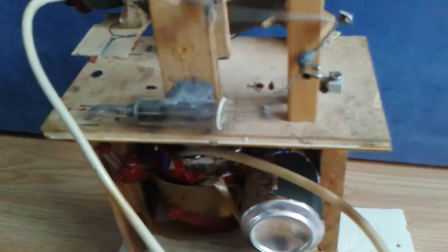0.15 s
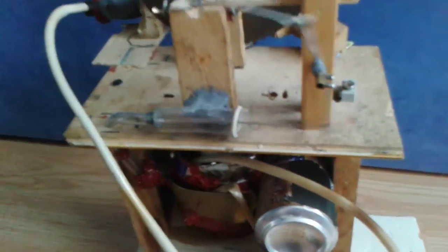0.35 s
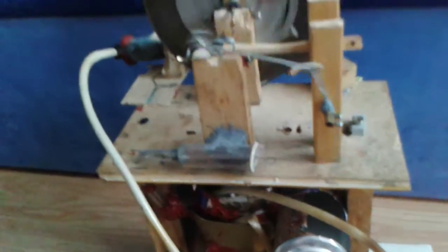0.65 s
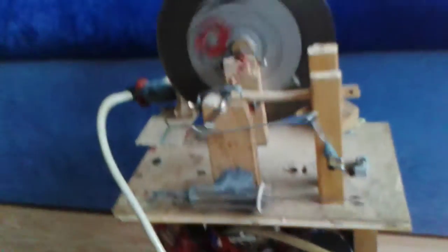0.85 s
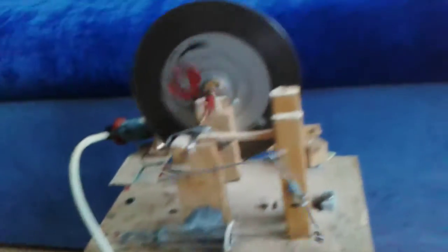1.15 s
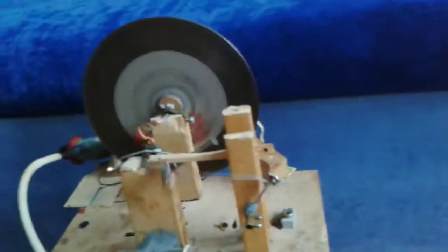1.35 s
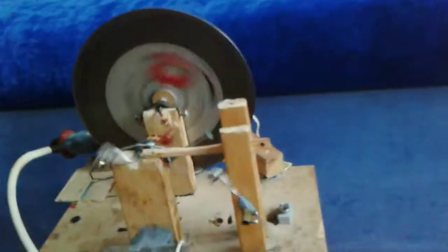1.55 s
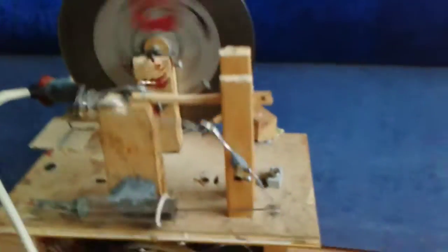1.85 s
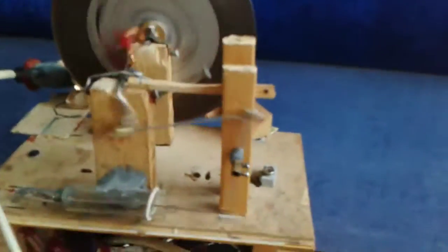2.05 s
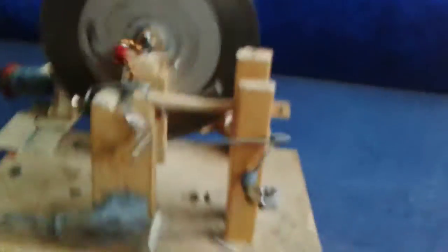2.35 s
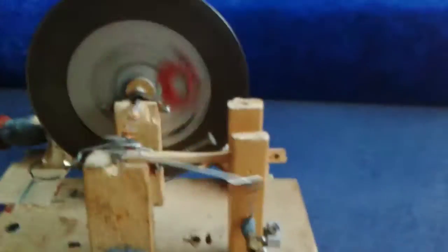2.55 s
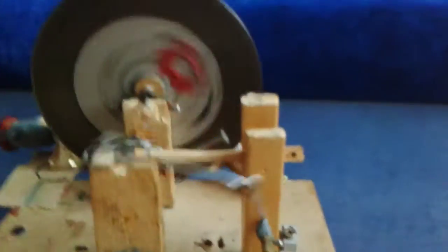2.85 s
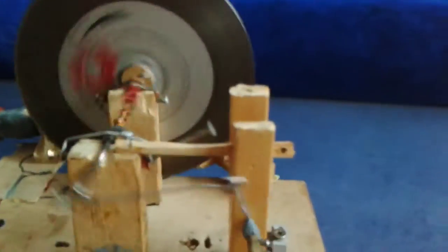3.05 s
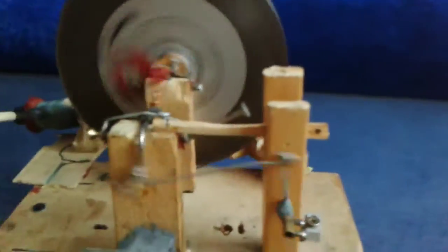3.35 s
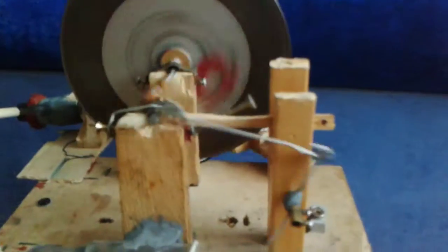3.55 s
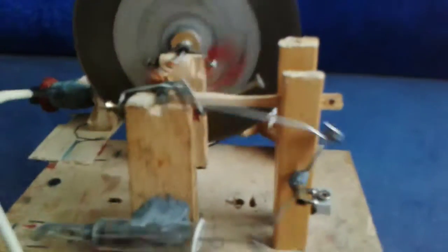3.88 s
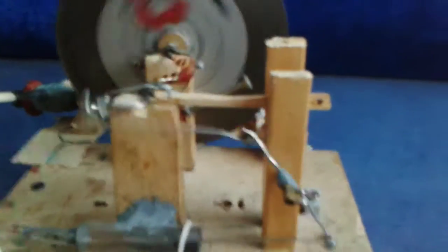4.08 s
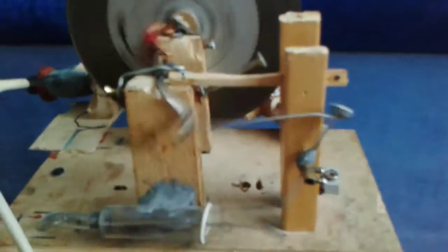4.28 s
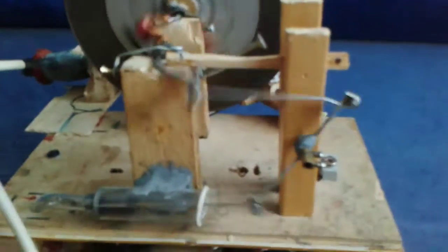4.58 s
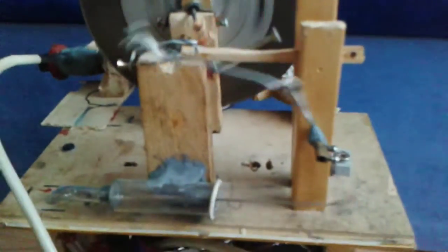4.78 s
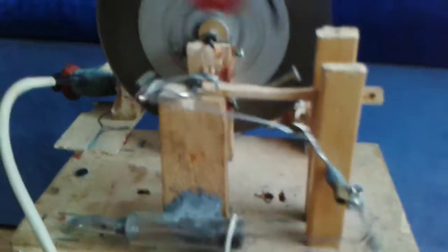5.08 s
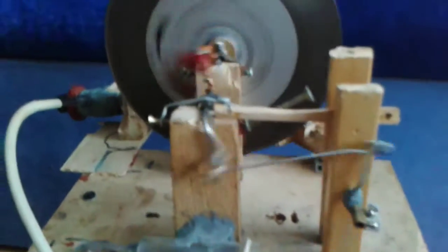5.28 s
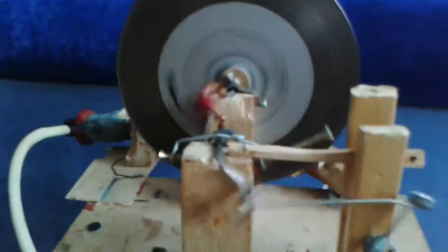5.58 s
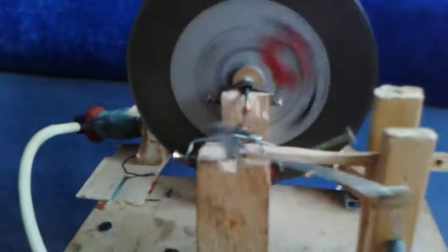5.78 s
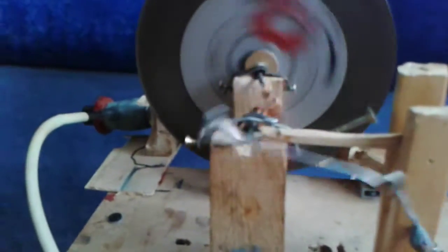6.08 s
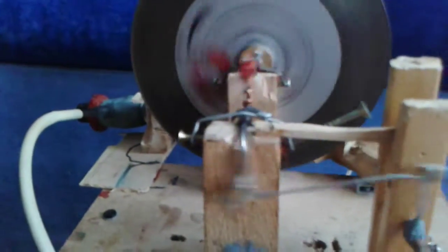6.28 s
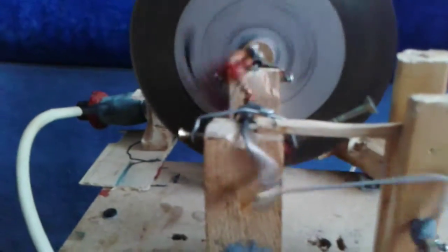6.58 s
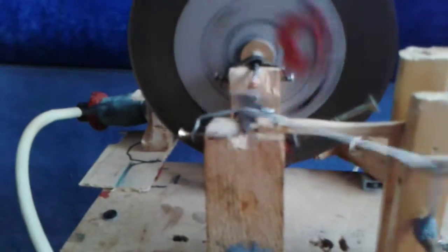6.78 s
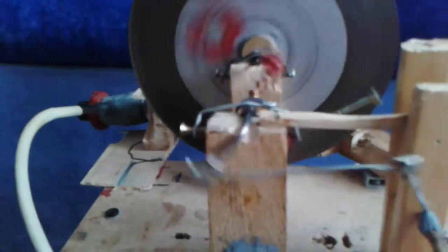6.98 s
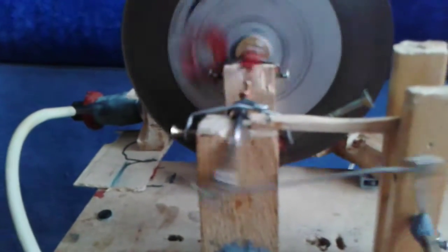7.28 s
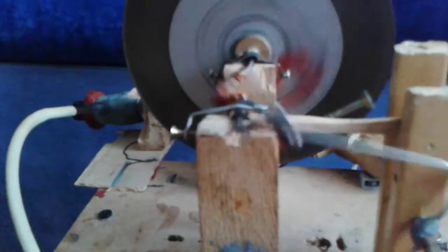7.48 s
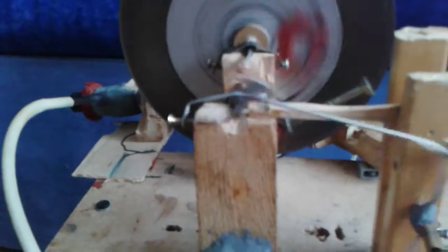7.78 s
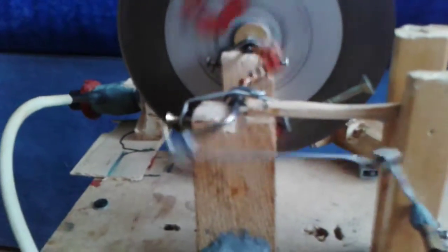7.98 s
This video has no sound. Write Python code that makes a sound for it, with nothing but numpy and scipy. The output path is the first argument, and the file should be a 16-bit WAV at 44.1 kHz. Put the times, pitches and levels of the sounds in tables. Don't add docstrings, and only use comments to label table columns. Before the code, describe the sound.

A sharp tick over a faint dull bump opens at 0.06 seconds, already in full steady running. A small engine turns about three times a second: each turn gives one crisp double-edged metallic tick, then about half a turn later a looser cluster of three, roughly six stroke groups a second, slowing only slightly. Wire brightness, dry wooden knocks and a soft hollow can note near 600 hertz ring briefly in a small room. Pump joints add lighter clicks between. Airy, scratchy piston rubbing and chatter strengthen from 2.3 to 3.3 seconds, flare briefly near 3.15 and 5, then fade lower after 5.5. Low bumps come near 0.5, 2.6, 2.7, 3.7, 3.9 and 4.6. After 5.4 the ticks sound a little duller. One especially bright snap stands out at 6.9. A low soft bump lingers at 7.9 as the ticking continues to the cut at 8.1. Close microphone, thin bass, light hiss.

```python
import sys
import numpy as np
from scipy import signal
from scipy.fft import rfft, irfft, next_fast_len
from scipy.io import wavfile
from scipy.ndimage import uniform_filter1d

SR = 44100
rng = np.random.default_rng(int(sys.argv[2]) if len(sys.argv) > 2 else 0)


def invert_db(x):
    u = np.asarray(x, float) / 20
    return 10 ** u


def transcribe(u):
    v = np.clip(np.atleast_2d(u).T, -1, 1)
    q = np.round(v * 32767).astype(np.int16)
    wavfile.write(sys.argv[1], SR, q)


N = 358533


def level(x, db):
    return x * invert_db(db) / np.sqrt(np.mean(x ** 2))


def colour(x, points):
    hz, db = np.transpose(points)
    size = next_fast_len(len(x))
    f = np.arange(size // 2 + 1) * SR / size + 1
    gain = invert_db(np.interp(np.log(f), np.log(hz), db))
    return irfft(rfft(x, size) * gain, size)[:len(x)]


def along(curve, s):
    return np.interp(s, *np.transpose(curve))


def walk(rate_hz):
    held = int(SR / rate_hz)
    steps = np.repeat(rng.standard_normal(N // held + 1), held)
    return 1.25 * uniform_filter1d(steps, held)[:N]


def decay(t, t60_s):
    return np.exp(-np.log(1000) * t / t60_s)


def place(times_s, sounds):
    out = np.zeros(N + len(sounds[0]))
    for s, sound in zip(times_s, sounds):
        i = int(np.clip(s * SR, 0, N))
        out[i:i + len(sound)] += sound
    return out[:N]


# frequency_hz, level_db
QUIET_SPECTRUM = [(20, -11), (50, -2), (110, 7), (250, -2.5), (476, -3), (750, -3), (2340, -16),
                  (3810, -4.5), (6030, -7), (7690, -31), (15000, -13.5)]


def quiet(push):
    noise = level(colour(rng.standard_normal(N), QUIET_SPECTRUM), -66)
    rumble = signal.sosfilt(signal.butter(2, 300, fs=SR, output="sos"), noise)
    shaking = signal.lfilter([1 / 2500], [1, 1 / 2500 - 1], np.abs(push))
    return noise + rumble * invert_db(2.6 * walk(11)) * level(shaking, 1.2)


# start_s, level_db, pitch_hz, t60_s
BUMPS = [
    (0.057, -49.5, 116, 0.061),
    (0.513, -48, 113, 0.062),
    (2.56, -35, 130, 0.025),
    (2.716, -40, 115, 0.03),
    (3.669, -49, 114, 0.087),
    (3.941, -39, 121, 0.017),
    (4.649, -55, 108, 0.11),
    (7.891, -49, 141, 0.33),
]


def bumps():
    t = np.arange(12000) / SR
    sag = t + 0.0047 * (1 - np.exp(-t / 0.026))
    rough = 1 + 0.17 * walk(83)[:len(t)]
    swings = []
    for _, db, hz, t60_s in BUMPS:
        envelope = (1 - np.exp(-t / 0.003)) * decay(t, t60_s)
        swings.append(invert_db(db + 5) * envelope * np.sin(2 * np.pi * hz * sag))
    return place([row[0] for row in BUMPS], np.array(swings) * rough)


# time_s, level_db
RUB = [(0, -2), (.9, -4.5), (1.9, -0.5), (2.35, 2), (2.62, 1.5), (2.8, 5), (3.07, -2.5), (3.15, 11),
       (3.21, 1), (3.25, 6), (3.3, -3), (4.5, 1), (4.9, -5), (4.97, 6), (5.1, -5.5), (5.8, -12),
       (6.95, -9.5), (8.13, -9.5)]


def rattle():
    rub_db = along(RUB, np.arange(N) / SR)
    hiss = colour(rng.standard_normal(N), [(1500, -12), (4000, 0.0), (6000, 9.5), (8000, -1.5), (15000, -12.5)])
    grains = rng.standard_normal(N) * invert_db(3.5 * walk(300))
    chatter = colour(grains, [(500, -7.5), (1000, -5.5), (1350, 3), (2100, -3.5), (5000, -26.5)])
    hiss = level(hiss, 3.0) * invert_db(1.8 * walk(30) + 1.2 * walk(250))
    chatter = level(chatter, 1.5) * invert_db(2.6 * walk(50))
    return hiss * invert_db(-59.5 + rub_db) + chatter * invert_db(-59.5 + 0.8 * rub_db)


# frequency_hz, level_db (per Hz)
TAIL_SPECTRUM = [(120, -5), (200, -3), (373, -6), (634, -2.5), (949, -7), (4510, -2), (5830, -1),
                 (7950, -15.5), (13500, -30), (15100, -28), (16000, -63)]


def tail(x):
    build_up_s, low_t60_s, high_t60_s = 0.004, 0.23, 0.18
    t = np.arange(16000) / SR
    lumpy = rng.standard_normal(len(t)) * invert_db(1.5 * walk(250)[:len(t)])
    noise = colour(lumpy, TAIL_SPECTRUM)
    low = signal.sosfilt(signal.butter(2, 2200, fs=SR, output="sos"), noise)
    faded = low * decay(t, low_t60_s) + (noise - low) * decay(t, high_t60_s)
    response = faded * (1 - np.exp(-t / build_up_s))
    return signal.fftconvolve(x, response / np.sqrt(np.sum(response ** 2)))[:N]


def lid():
    lid_hz, lid_db, lid_t60_s = 584.5, -50.5, 0.12
    t = np.arange(6000) / SR
    times_s = [row[0] for row in OUTWARD + INWARD]
    chance = rng.standard_normal((len(times_s), 2))
    ring = (1 - np.exp(-t / 0.0044)) * decay(t, lid_t60_s)
    hz = lid_hz * (1 + .01 * chance[:, :1])
    notes = np.sin(2 * np.pi * hz * t) * invert_db(lid_db + 3 * chance[:, 1:])
    return place(times_s, ring * notes)


# time_s, level_db
BOARD = [
    (0, 1.5),
    (1.3, -1.5),
    (1.9, 1.5),
    (3.2, 1),
    (4.2, 2.5),
    (4.9, -2),
    (5.5, -4.5),
    (7.2, -4),
    (8.13, -5),
]


def shakes():
    rows = []
    for table, delay_s, can_db, length_s in ((OUTWARD, .00336, -47, .054), (INWARD, .014, -40.5, .022)):
        for row in table:
            db = can_db + along(BOARD, row[0]) + 2.5 * rng.standard_normal()
            rows.append((row[0] + delay_s, db, length_s))
    return rows


def can():
    t = np.arange(6000) / SR
    rings, rows = [], shakes()
    for (_, db, length_s), (phase, beat, off) in zip(rows, rng.random((len(rows), 3))):
        hz = 682 - 550 * length_s + 4 * (off - .5)
        fall = np.exp(-(t / (1.06 * length_s)) ** 2) + 0.14 * np.exp(-t / 0.073)
        swell = (1 - np.exp(-t / 0.0058)) ** 2 * fall
        pair = np.sin(2 * np.pi * (hz * t + phase)) + 0.25 * np.sin(2 * np.pi * ((hz + 32) * t + beat))
        rings.append(invert_db(db + 1.0) * swell * pair)
    return place([row[0] - .004 for row in rows], rings)


# start_s, wire_db, wood_minus_wire_db
PUMP_PIN = [(.1072, -45.5, 1), (.4198, -47.5, 1), (.7272, -44, -4), (1.0365, -39, -6),
            (1.3566, -40.5, -2.5), (1.6734, -39.5, -11), (1.991, -36, -7), (2.3118, -40.5, -5),
            (2.6331, -41, -1.5), (2.9577, -41, -1), (3.284, -36, -9), (3.6122, -37, -14),
            (3.9421, -40, -9.5), (4.272, -39, -9.5), (4.6012, -40, -13), (4.9313, -40.5, -3.5),
            (5.26, -46, -9), (5.593, -44, -8), (5.9257, -40, -12)]
# start_s, wire_db, wood_minus_wire_db
PUMP_PUSH = [(2.4083, -40, -10), (2.7304, -31.5, -12), (3.0576, -41.5, -3.5), (3.382, -41, -2),
             (3.7102, -38.5, -0.5), (4.0438, -37.5, -6), (4.3758, -39, -7), (4.7073, -37.5, -2.5),
             (5.031, -52.5, 9.5), (5.36, -39.5, -11), (5.694, -48, -12), (6.0275, -48, -15),
             (6.3532, -44, -8), (6.688, -50.5, 0.5), (7.014, -43.5, -2.5), (7.3477, -48.5, -3),
             (7.6788, -49, -7), (8.006, -43.5, -7)]
# start_s,
# wire_db, wood_minus_wire_db
PUMP_PULL = [(.2853, -42.5, -1.5), (.592, -37.5, -9.5), (.9019, -38, -11.5), (1.2133, -37.5, -7.5),
             (1.5286, -39.5, -20), (1.8414, -36, -6.5), (2.1666, -42.5, -6), (2.4878, -39.5, -9),
             (2.811, -38, -9), (3.141, -45, -10), (3.463, -39.5, -9), (3.7932, -56, 15.5),
             (4.1217, -39.5, -29), (4.4505, -36, -4.5), (4.7812, -38.5, -4)]
# start_s, wire_db, wood_minus_wire_db, pitch_hz
STRAY = [(0.302, -65, 22.5, 1735), (.5498, -48, 3.5, 1420), (1.3337, -41.5, -5, 1620),
         (1.6367, -41.5, -10, 2020), (1.71, -41.5, -0.5, 1380), (2.266, -44, 2, 5870),
         (2.4482, -45, -16, 1460), (2.4772, -43, -4, 1360), (2.565, -39, -25, 8240),
         (2.663, -44, -36, 6400), (2.7653, -38, 8, 5430), (2.8734, -35, -13, 1380),
         (2.9053, -46, -12, 5700), (2.921, -43, -3, 1340), (3.1165, -44, -5, 1340), (3.791, -42, -14, 6230),
         (3.5977, -43, 6, 6000), (3.6326, -42, -4, 1560), (3.762, -35, -6.5, 1325),
         (3.8745, -43.5, -3, 1890), (4.196, -45, -6, 1650), (4.4903, -38, -11, 1450),
         (4.8493, -49, 5, 1850), (6.238, -41, -8, 1250), (6.875, -22, -12, 5400), (7.003, -42, -12, 1320),
         (7.0295, -45, 1, 2370), (7.4972, -46.5, -11, 5300), (7.7912, -47, -14, 1280),
         (8.1224, -48, -17, 5340)]
PIN_HZ, PUSH_HZ, PULL_HZ = 1992, 1304, 1306


def loose_parts():
    pump = []
    for table, hz in ((PUMP_PIN, PIN_HZ), (PUMP_PUSH, PUSH_HZ), (PUMP_PULL, PULL_HZ)):
        pump += [(*row, hz) for row in table]
    return pump + STRAY


def pings():
    s, wire_db, wood_rel_db, hz = np.transpose(loose_parts())[:, :, None]
    t = np.arange(900) / SR
    low_db = wire_db + wood_rel_db + 6.0 + 3 * (hz == PIN_HZ)
    db = np.where(hz > 3500, wire_db + 14.0, low_db)
    cycles = t * hz
    shape = (1 - np.exp(-cycles / 1.6)) ** 2 * np.exp(-cycles / 8)
    note = np.sin(2 * np.pi * cycles) + 0.29 * np.sin(2 * np.pi * 1.35 * cycles)
    return place(s[:, 0] - .001, invert_db(db) * shape * note)


def strike(modes, count, scatter_db, detune, contact_s, size):
    hz, db, t60_s = np.transpose(modes)
    chance = rng.standard_normal((count, 2, len(modes)))
    t = np.arange(size) / SR
    turn = 2 * np.pi * hz * (1 + detune * chance[:, 0])
    ring = np.sin(turn[:, :, None] * t) * decay(t, t60_s[:, None])
    ring = np.einsum("em,emt->et", invert_db(db + scatter_db * chance[:, 1]), ring)
    touch = np.arange(400) / SR
    contact = rng.standard_normal((count, len(touch))) * touch ** 2 * np.exp(-touch / contact_s)
    rung = signal.fftconvolve(ring, contact, axes=1)
    return rung / np.abs(rung).max(axis=1, keepdims=True)


# frequency_hz, level_db, t60_s
WIRE = [(3403, -6, 0.043), (4440, 4, 0.014), (4610, 1.5, 0.014), (5170, -1.5, 0.054), (5860, 13.5, 0.0081),
        (6360, 4.5, 0.019), (7400, -47, 0.0044), (8800, -51, 0.0036), (10070, -7, 0.013), (12700, -1, .004)]
# frequency_hz, level_db, t60_s
WOOD = [(590, -30, 0.022), (860, -2, 0.096), (1250, 2.5, 0.33), (1420, 6.5, 0.14), (1680, 11.5, 0.078),
        (1970, 7.5, 0.042), (2294, 20.5, 0.015), (2560, -2, 0.01)]


def linkage(s, wire_db, wood_db):
    wire = strike(WIRE, count=len(s), scatter_db=2.5, detune=.04, contact_s=.0006, size=600)
    wood = strike(WOOD, count=len(s), scatter_db=3.0, detune=.05, contact_s=.0008, size=1300)
    wire = wire * invert_db(wire_db)[:, None]
    graze = place(s - .0035 - .002 * rng.random(len(s)), wire * invert_db(-19))
    direct = graze + place(s - .0011, wire) + place(s - .0014, wood * invert_db(wood_db)[:, None])
    return signal.sosfilt(signal.butter(2, 11000, fs=SR, output="sos"), direct)


def cracks(s, db):
    t = np.arange(200) / SR
    snap = rng.standard_normal((len(s), len(t))) * np.exp(-t / 0.00011)
    snap = snap / np.abs(snap).max(axis=1, keepdims=True) * invert_db(db - 19)[:, None]
    band = signal.butter(2, [1800, 10400], "band", fs=SR, output="sos")
    return signal.sosfilt(band, place(s - .0004, snap))


def blows(s, db):
    t = np.arange(400) / SR / .0012
    burst = rng.standard_normal((len(s), len(t))) * t ** 2 * np.exp(-t) * 2
    return place(s - .002, burst * invert_db(db)[:, None])


def ticks(table, wire_gain_db, wood_gain_db, tail_db):
    s, wire_db, wood_rel_db = np.transpose(table)[:3]
    ringing = linkage(s, wire_db + wire_gain_db, wire_db + wood_rel_db + wood_gain_db)
    direct = ringing + cracks(s, wire_db + wire_gain_db)
    return direct, blows(s, wire_db + 0.27 * wood_rel_db + tail_db)


# seat_s, seat_db, touch_before_ms, touch_db
OUTWARD = [(0.0602, -24, 4.9, -29), (0.3551, -26, 5.3, -30), (0.6564, -27, 3.4, -29),
           (0.963, -26, 2.6, -31), (1.2716, -28, 3.9, -23.5), (1.5849, -28.5, 4.4, -27),
           (1.8978, -22, 2.83, -26), (2.2153, -28, 5.4, -25), (2.532, -25, 3.9, -25),
           (2.8524, -27.5, 4.5, -22.5), (3.1717, -25.5, 4.1, -26.5), (3.4972, -23.5, 4.6, -31.5),
           (3.8201, -20.5, 5.7, -28), (4.1456, -24, 4, -27), (4.4715, -24.5, 4.1, -30),
           (4.7982, -24.5, 6.5, -32), (5.1238, -26, 5.5, -34), (5.45, -24, 4.7, -33.5),
           (5.7773, -26.5, 3.6, -32), (6.1053, -23, 4.7, -28.5), (6.434, -22.5, 5.1, -28),
           (6.7629, -24, 5, -27), (7.0902, -25, 5.6, -26.5), (7.4157, -22, 4.7, -28),
           (7.7399, -25.5, 5.9, -25.5), (8.0678, -25, 5.3, -27.5)]
# start_s, first_db, second_db, third_db
INWARD = [(0.2014, -31.5, -32, -32), (.5003, -34.5, -34, -32), (.8042, -34, -31, -33),
          (1.1118, -28.5, -30.5, -32), (1.4227, -33, -31.5, -30), (1.736, -37, -28, -32),
          (2.0512, -28.5, -33, -31), (2.3673, -40, -28, -33), (2.6865, -25.5, -28, -32),
          (3.0062, -37, -25.5, -31), (3.3287, -28.5, -27.5, -37), (3.6517, -27, -29.5, -32.5),
          (3.9766, -26, -28, -34), (4.3021, -28, -27.5, -43), (4.6274, -31.5, -28.5, -33),
          (4.954, -34.5, -27, -34), (5.2811, -31, -33.5, -31.5), (5.607, -35.5, -28, -36.5),
          (5.9347, -38.5, -28, -36.5), (6.2621, -33, -25, -27.5), (6.5885, -33, -29, -32.5),
          (6.9176, -26, -26, -28.5), (7.245, -36, -26, -34.5), (7.5685, -35.5, -27, -31),
          (7.894, -33, -31, -28)]
# time_s, delay_ms
PLAY = [
    (0, 6.4),
    (1.75, 5.9),
    (2.05, 7.9),
    (3.0, 9),
    (4.95, 8.7),
    (5.28, 6.6),
    (6.6, 7),
    (7.2, 8.8),
]
POST_DB = [-49, -35, -39, -36.5, -41.5, -35]


def strokes():
    seat, seat_db, touch_ms, touch_db = np.transpose(OUTWARD)
    first, *joint_db = np.transpose(INWARD)
    rebound_s, rebound_db, third_joint_s = 0.0105, -16, 0.019
    second = first + along(PLAY, first) / 1e3
    times = [seat - touch_ms / 1e3, seat, seat + rebound_s, first, second, first + third_joint_s]
    wire_db = [touch_db, seat_db, seat_db + rebound_db, *joint_db]
    wood_db = [db + along(BOARD, s) for s, db in zip(times, POST_DB)]
    s, wire_db, wood_db = map(np.concatenate, (times, wire_db, wood_db))
    return np.transpose([s, wire_db, wood_db - wire_db])


# time_s, level_db
VIEW = [
    (0, 6),
    (1.5, -1),
    (2.9, 3),
    (3.6, 0),
    (4.7, 2.5),
    (5.4, -5),
    (8.13, -5.5),
]


def shade(x):
    band = signal.sosfiltfilt(signal.butter(2, [3300, 5200], "band", fs=SR, output="sos"), x)
    return x + band * (invert_db(along(VIEW, np.arange(N) / SR)) - 1)


def scene():
    stroke, stroke_push = ticks(strokes(), wire_gain_db=4.5, wood_gain_db=1.5, tail_db=-6.5)
    loose, loose_push = ticks(loose_parts(), wire_gain_db=5.5, wood_gain_db=-3.0, tail_db=-7.5)
    engine = stroke + loose + pings() + tail(stroke_push + loose_push)
    engine = signal.sosfilt(signal.butter(2, 400, "high", fs=SR, output="sos"), engine)
    background = quiet(stroke_push) + bumps()
    return (background + lid() + can() + shade(engine + rattle()))[None]


def low_pass(x):
    return signal.sosfilt(signal.butter(12, 16110, fs=SR, output="sos"), x)


def record(dry):
    dry = signal.sosfilt(signal.butter(1, 45, "high", fs=SR, output="sos"), dry)
    dry = signal.sosfilt(signal.ellip(8, .2, 40, 15000, fs=SR, output="sos"), dry)
    return low_pass(dry)


dry = scene()
out = record(dry)
transcribe(out)
```